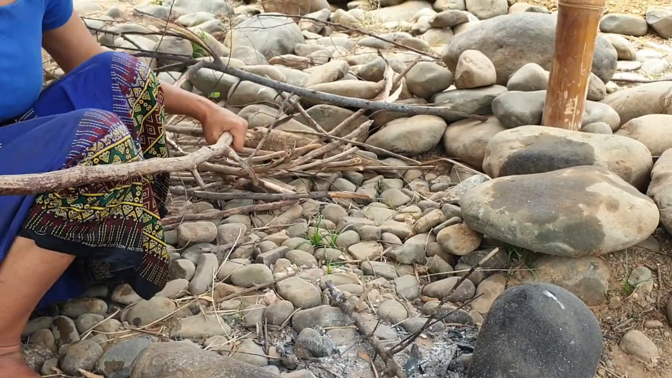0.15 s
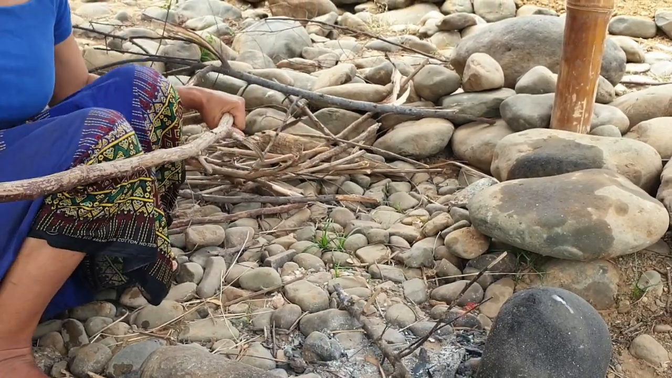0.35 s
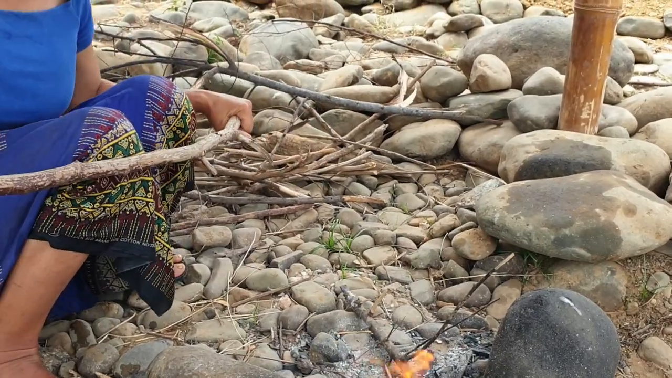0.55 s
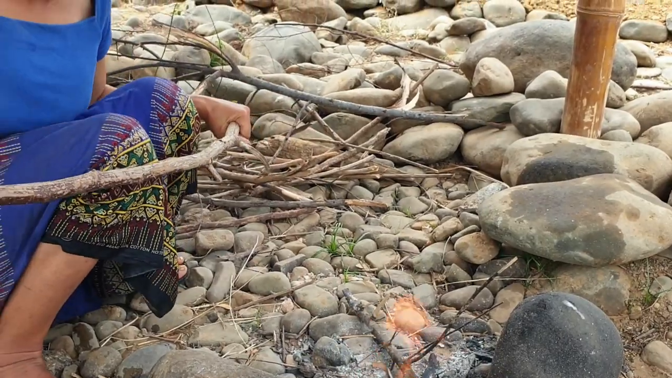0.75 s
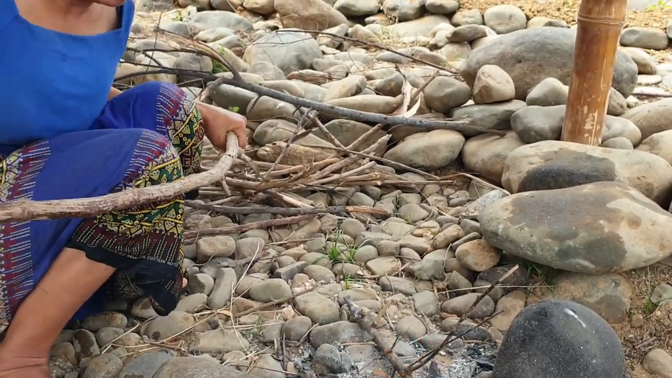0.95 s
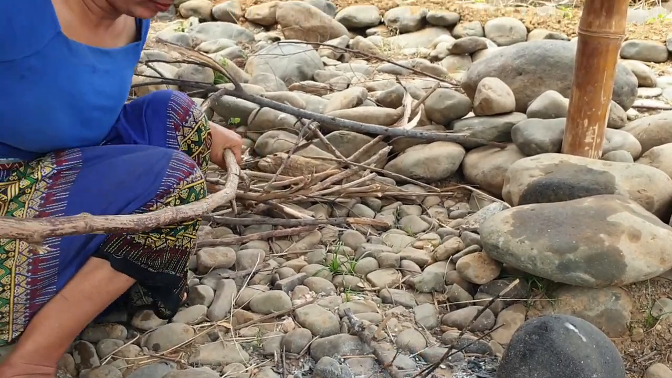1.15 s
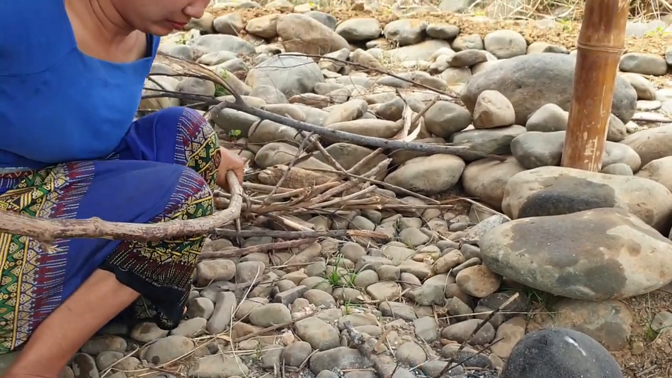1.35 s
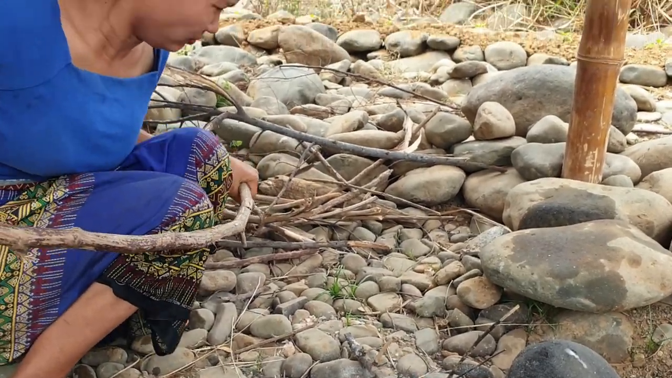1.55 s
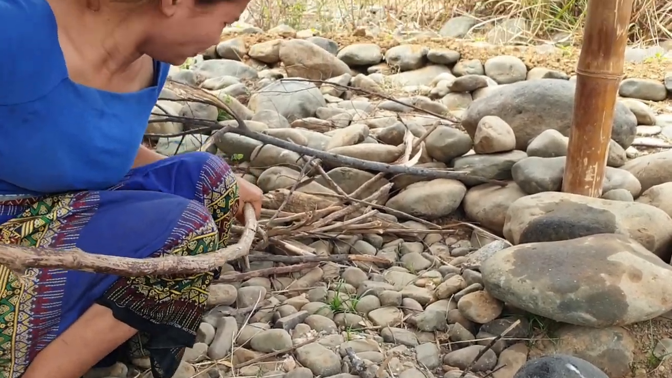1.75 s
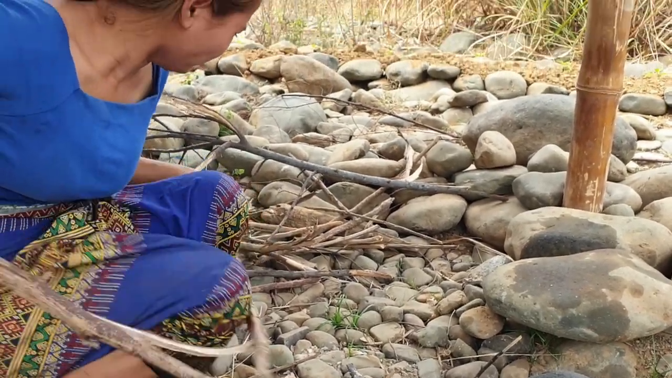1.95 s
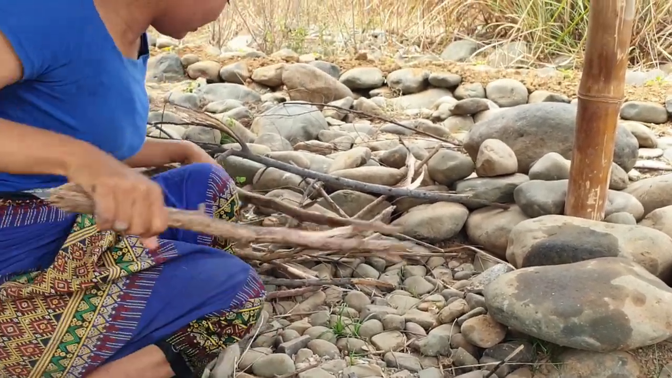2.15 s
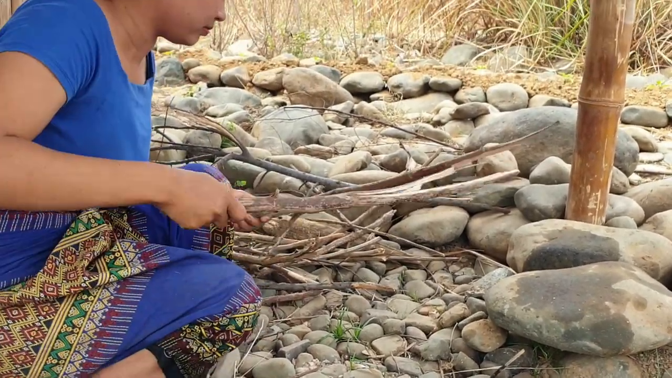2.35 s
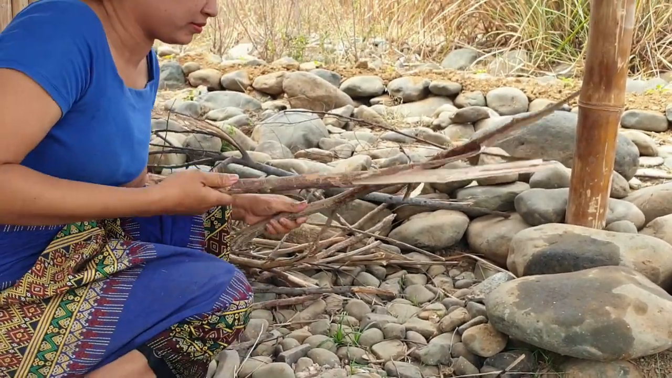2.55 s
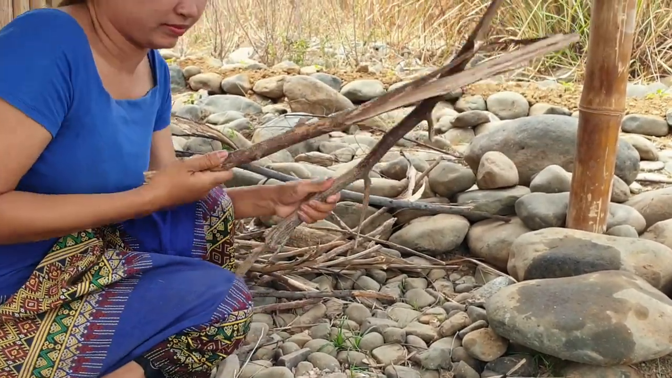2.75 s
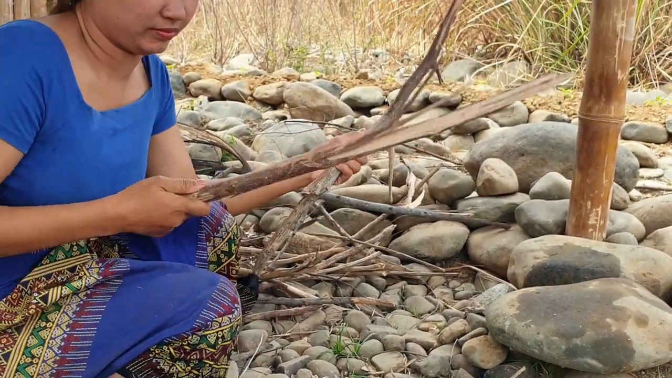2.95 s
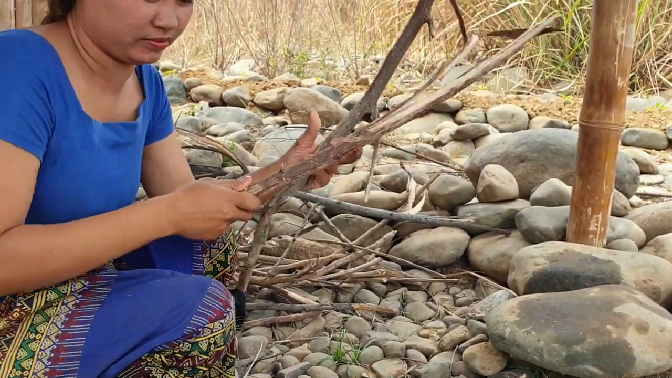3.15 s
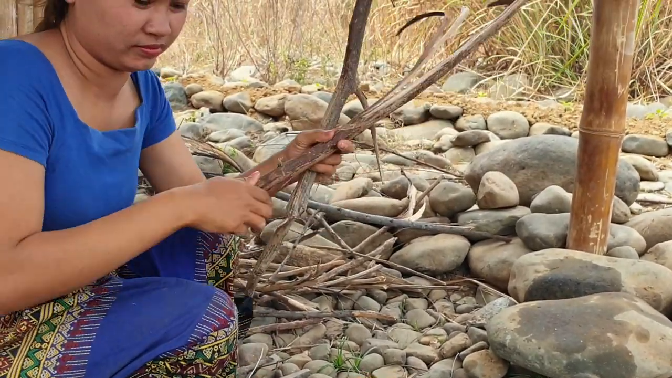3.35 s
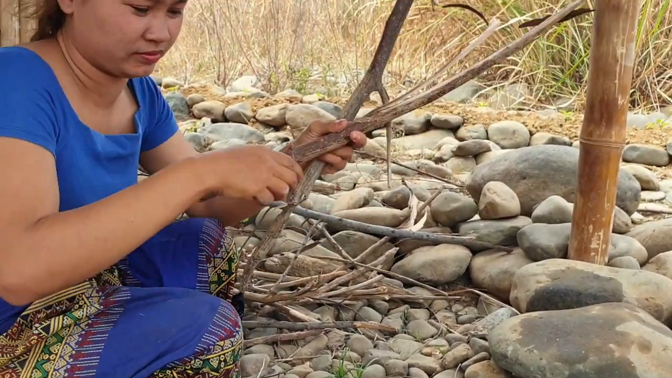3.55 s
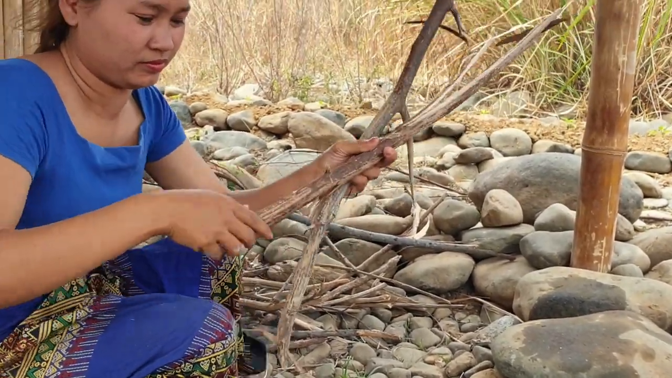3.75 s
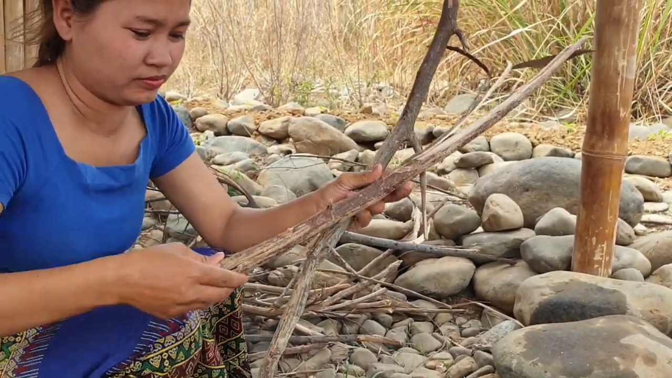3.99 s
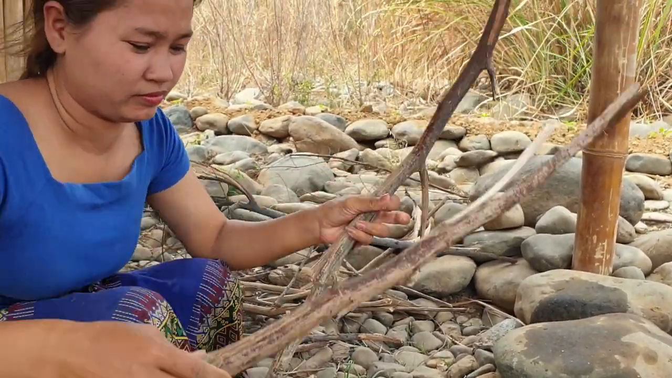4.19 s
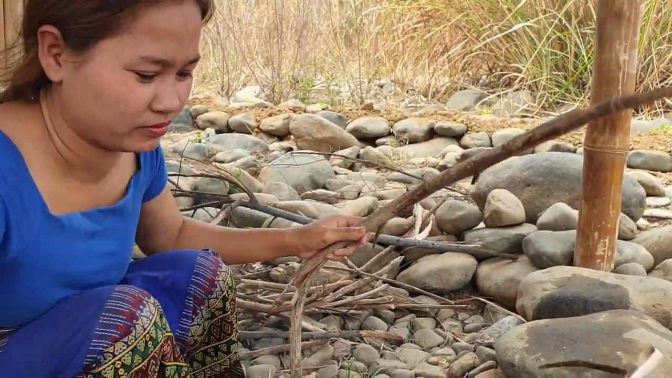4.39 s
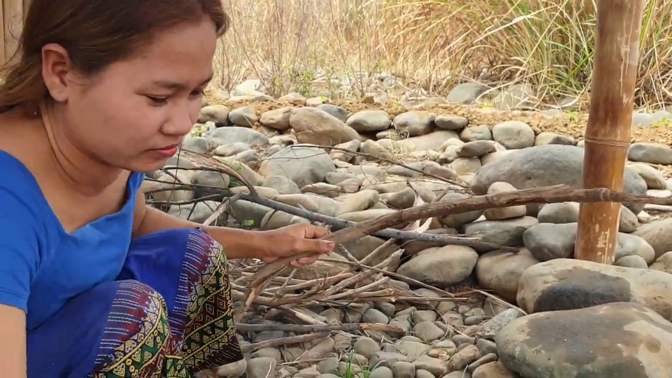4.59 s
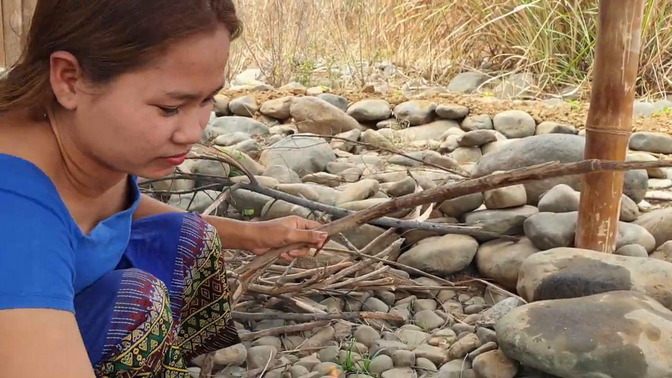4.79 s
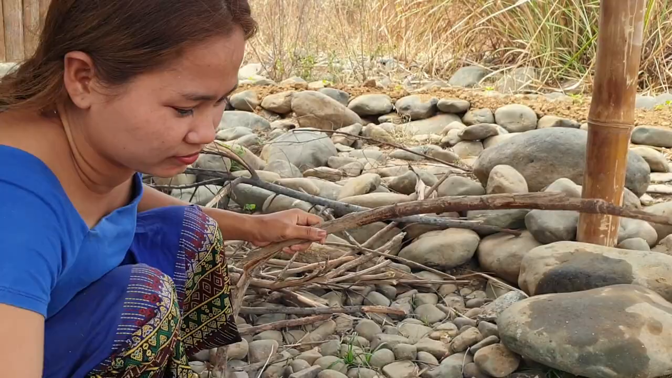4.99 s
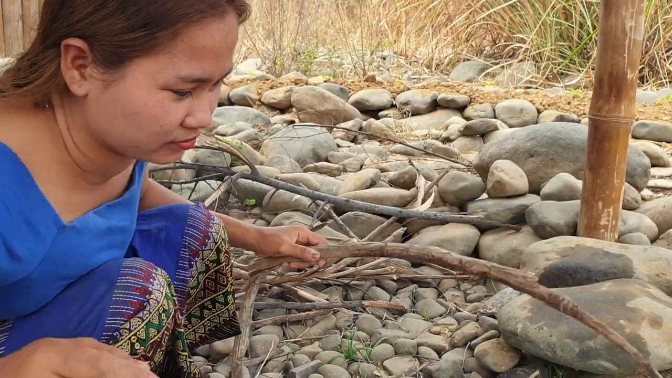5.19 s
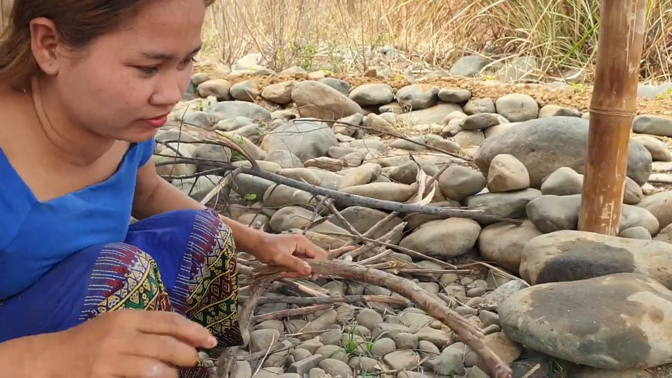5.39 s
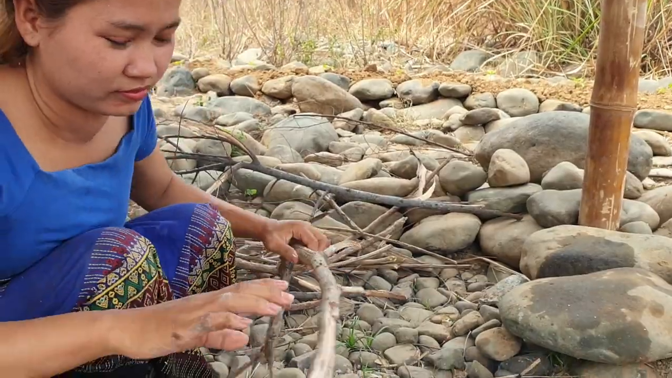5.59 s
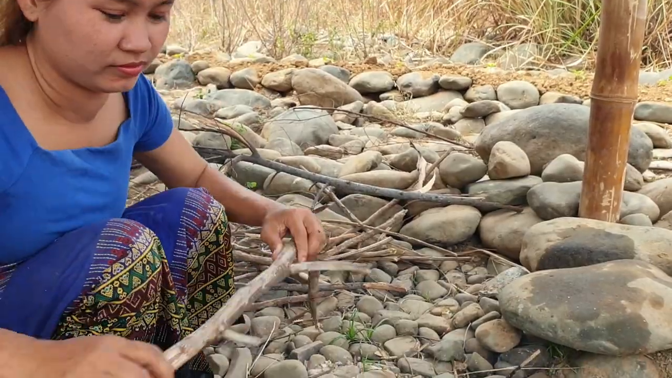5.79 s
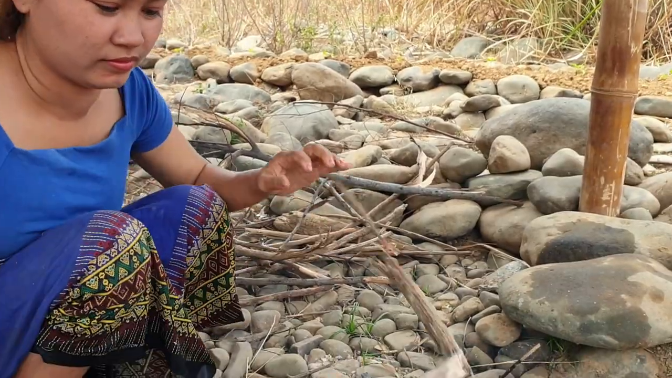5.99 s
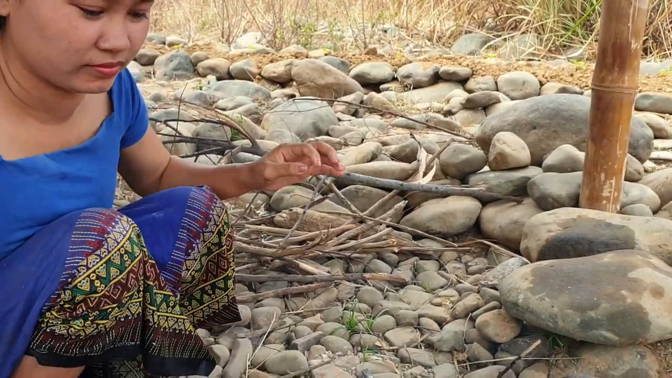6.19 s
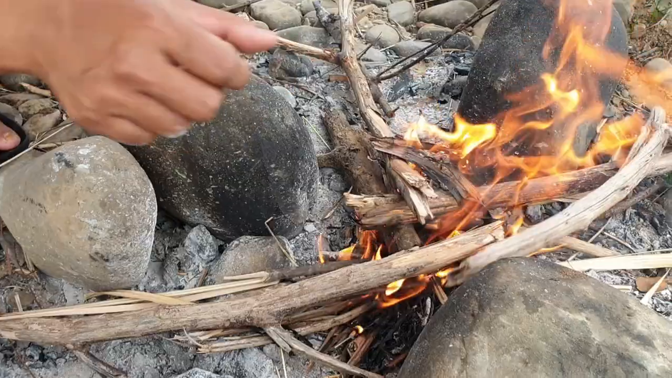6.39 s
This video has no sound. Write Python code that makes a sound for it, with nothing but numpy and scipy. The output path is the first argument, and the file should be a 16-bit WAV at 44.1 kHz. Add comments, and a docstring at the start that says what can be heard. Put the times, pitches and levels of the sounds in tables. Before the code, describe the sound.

Outdoors by a small fire, sharp fibre cracks lead to one loud stick break, then near quiet, light wood taps, ember ticks and growing rustle.

```python
"""A dry stick is bent by hand on a stony bank by a campfire, in broadband hiss, low air noise and a far engine.
From 0.5 s its fibres crack, as impulses through resonances; splinters tear, as runs of tiny slips.
At 2.0 s it breaks with a thump of decaying pressure, knock and swing, and the background sinks.
From 3.2 s loose pieces knock at lower resonances; the fire's louder ticks follow as short noise impulses.
From 4 s a rustle of noise grains grows, the background recovers, and the engine's harmonics swell again."""
import sys
import numpy as np
from scipy import signal
from scipy.fft import rfft, irfft
from scipy.io import wavfile
from scipy.ndimage import uniform_filter1d

SR = 44100
rng = np.random.default_rng(int(sys.argv[2]) if len(sys.argv) > 2 else 0)


def file_out(sig):
    """Save sig as 16-bit WAV at sys.argv[1]."""
    # one column per channel
    cols = np.atleast_2d(sig).T
    # limit, then scale
    lim = np.clip(cols, -1, 1)
    pcm = np.round(lim * 32767).astype(np.int16)
    wavfile.write(sys.argv[1], SR, pcm)


N = 283386
TIME = np.arange(N) / SR
RING_S = 0.12   # length of a short impulse
BREAK_S = 2.0116
FAINT_START_S = 0.65   # faint random cracks lie between this time and the break

# Fibres giving way: [t/s, relative energy level/dB, relative low-part level/dB]
CRACKS = [(0.503, -4.5, 0.5), (0.5673, 4, -3.5), (0.6639, -12, -18), (0.679, -17.5, -6), (0.721, -20, 4.5),
          (0.8045, -16.5, -16), (0.91, -2, -1), (0.9509, -13.5, 0), (1.0037, -2, 1.5), (1.135, -5.5, -3.5),
          (1.3864, -11.5, 0), (1.476, -12.5, -2), (1.4895, -8, -5), (1.4973, -5.5, -9),
          (1.5172, -5.5, -7.5), (1.6061, -12.5, -18), (1.6117, -4.5, -20), (1.949, -15, -1),
          (1.9625, -1, -4.5), (2.0115, 12.5, -0.5), (2.0256, 10.5, -7.5), (2.06, -7, -1.5),
          (2.0719, 3, -17), (2.0805, -3, -15), (2.103, -19, -5), (2.3364, -33.5, 0), (2.8542, -22.5, -11),
          (2.8653, -16.5, -5), (2.8723, -30, -10), (2.8867, -24, -5), (2.9029, -22, -4), (2.9207, -21, -6)]
# Splinters tearing and bark scraping: [t/s, starting level/dB, t60/s, low edge f/Hz, top edge f/Hz]
TEARS = [(1.491, -35.5, 0.1, 3000, 15000), (2.013, -17.5, 0.11, 1200, 10700),
         (2.028, -24, 0.15, 1500, 9100), (2.077, -47, 0.12, 3000, 12000), (2.125, -55.5, 0.33, 1500, 7000),
         (2.867, -49, .15, 9900, 17900), (2.872, -49, 0.37, 1100, 14100), (2.941, -43.5, 0.082, 1500, 7700),
         (3.29, -60, 0.21, 1300, 6000), (4.86, -47.5, 0.32, 2500, 11100), (5.885, -50, 0.26, 2500, 9000)]
# Sticks touching each other and pebbles:
# [t/s, relative energy level/dB, relative low-part level/dB, relative top-part level/dB]
KNOCKS = [(3.2284, -33.5, -10, -4), (3.28, -18, -9, -28), (3.7227, -29, -9, -5.5), (4.856, -20.5, -15, -6),
          (4.908, -29.5, 13.5, -1), (4.9364, -9.5, 6, -4.5), (5.0324, -22.5, -5, -4.5),
          (5.2082, -22, -2, -2), (5.4738, -20, -8, 0), (5.8754, -11, -20, -7), (5.892, -17, -15, -15),
          (6.3035, -17.5, 0, -4)]
# The fire's loudest ticks: [t/s, relative energy level/dB]
EMBERS = [(3.843, -33), (4.1042, -37), (4.251, -29), (4.3142, -30), (4.3435, -32.5), (4.458, -34),
          (4.4917, -31), (5.391, -19.5), (5.6726, -26), (5.7143, -24), (6.214, -24), (6.2207, -22.5),
          (6.268, -25)]
# Resonances of the bent stick: [f/Hz, bandwidth/Hz, level/dB]
STICK_MODES = [(2370, 210, -4), (3570, 100, -2.5), (4185, 290, -3.5), (5230, 370, -1), (5880, 120, -2),
               (6410, 350, -3), (12500, 1300, -9.5)]
# Resonances of the loose pieces: [f/Hz, bandwidth/Hz, level/dB]
PIECE_MODES = [(680, 105, 4.5), (1120, 110, 1.5), (1716, 120, 0), (3170, 220, -2), (4160, 130, -3.5),
               (4770, 100, 1), (6380, 290, 3)]
# Puffs of air as arms and sticks swing past: [middle t/s, length/s, level/dB, centre f/Hz]
PUFFS = [(1.005, .12, -51.5, 220), (1.53, .12, -44, 60), (2.63, .3, -55, 79.6), (2.87, .2, -56.5, 80.4),
         (3.15, .18, -46.5, 69), (4.31, .18, -54.5, 69.9), (4.87, .12, -48.5, 90.5), (5.35, .14, -43, 100),
         (5.49, .1, -42.5, 75), (5.62, 0.21, -48, 146)]
# Swells of a far engine: [centre t/s, rise spread/s, fall spread/s, f/Hz, level over low background/dB]
DRONES = [(.85, 0.78, .6, 62.45, 11), (5.3, .4, 0.27, 81, 5.5)]
# Background before layer gains: [t/s, treble level/dB, low-band level/dB, bass level/dB]
BACKGROUND = [(0.0, -61, -63.5, -58.5), (0.48, -61.5, -61, -54), (0.86, -58, -58.5, -50.5),
              (1.13, -57.5, -57.5, -54), (1.7, -57, -60, -56), (1.95, -56, -57, -52), (2.11, -66, -72, -61),
              (2.29, -74.5, -76.5, -67.5), (3.15, -75, -74.5, -64), (3.83, -70.5, -73, -69),
              (4.15, -71.5, -75.5, -69.5), (4.54, -65, -65, -61.5), (4.85, -64, -61.5, -61),
              (5.08, -60.5, -58.5, -52), (5.32, -60, -57, -52), (5.89, -60, -58, -62),
              (6.43, -60, -59, -57.5)]
# Relative spectral densities of bass air, low-band air and treble hiss: [f/Hz, level per Hz/dB]
RUMBLE = [(20, -10.5), (35, -8), (55, 2), (80, 0), (125, -4.5), (170, -12), (260, -28.5), (500, -60)]
FLUTTER = [(80, -31.5), (170, -2.5), (250, -2.5), (400, -6.5), (600, -13), (900, -21), (2000, -38)]
HISS = [(200, -13.5), (600, -0.5), (1200, -1), (1700, -1), (2500, -1.5), (4000, -2.5), (6400, -1.5),
        (9000, -5.5), (11500, -3), (16000, -13)]
# Correlation of left and right in the air noise: [f/Hz, coefficient]
SIDE_CORRELATION = [(60, 0.59), (300, 0.59), (640, 0.53), (1300, -0.45), (2600, .05), (6000, -.05),
                    (15000, 0.14)]


def cracks(top_per_weaker_db=0.2226, woody_db=1, lowest_hz=2000, linger_db=-11, faint_db=-25,
           faint_spread_db=2.5):
    """Impulse excitation: each failing fibre rings the stick's modes, and weaker cracks are brighter."""
    out = np.zeros((2, N))
    faint = []
    for when, size in rng.random(size=(5, 2)):
        s = FAINT_START_S + when * (BREAK_S - FAINT_START_S)
        faint.append((s, faint_db + faint_spread_db * (2 * size - 1), 0))
    for s, db, low_db in list(CRACKS) + faint:
        top_db = -top_per_weaker_db * db
        linger = from_db(linger_db) * dying_noise(t60=0.14, length_s=RING_S)
        ring = impulse(spike_db=-3, t60=0.032) + linger
        crack = coloured(ring, 3600, low_db + woody_db, 8000, top_db)
        add(out, s, from_db(db) * panned(crack, pan_db=2))
    rung = wood(out, STICK_MODES, broad_db=-3)
    bright = cut(rung, lowest_hz, "high", order=6)
    faint_body = from_db(-24.5) * cut(rung, [300, 1800], "band")
    return bright + faint_body


def thump(swing_hz=60, swell_s=0.0075, swing_db=-12, jolt_db=-5, jolt_s=0.00081, pull_db=-22,
          pull_s=0.009, knock_db=11, clack_db=11, right_lag_s=0.0002):
    """Release of strain: a pressure jolt, slower pull of air, dull knock, woody clack and damped swing."""
    out = np.zeros((2, N))
    t = TIME[:SR // 4]
    # The swing's envelope peaks at swell_s
    swell = t / swell_s * np.exp(1 - t / swell_s)
    swing = from_db(swing_db) * swell * np.sin(2 * np.pi * swing_hz * t)
    since = t - np.array([[0], [right_lag_s]])
    step = from_db(jolt_db) * (since >= 0) * np.exp(-since / jolt_s)
    jolt = cut(step, 1800, "low", order=1)
    pull = from_db(pull_db) * np.exp(-t / pull_s)
    add(out, BREAK_S, swing - pull - panned(jolt, pan_db=6))
    knock = cut(dying_noise(t60=0.15, length_s=0.24), 160, "high")
    knock = cut(knock, 380, "low", order=1)
    add(out, BREAK_S, from_db(knock_db) * panned(knock, pan_db=4))
    clack = cut(dying_noise(t60=0.07, length_s=RING_S), [1200, 2000], "band")
    add(out, BREAK_S, from_db(clack_db) * clack)
    return out


def tears(per_s=2500, spread_db=3.5, slip_s=0.0004):
    """Stick-slip: splitting or sliding wood emits a dying run of tiny slips that excite its modes."""
    out = np.zeros((2, N))
    t = TIME[:SR // 4]
    for s, db, t60, low_hz, top_hz in TEARS:
        slips = grains(len(t), per_s, spread_db, slip_s)
        rung = wood(slips, STICK_MODES, broad_db=2)
        edged = cut(cut(rung, low_hz, "high"), top_hz, "low", order=4)
        decay = from_db(db - 60 * t / t60)
        add(out, s, decay * panned(rms_one(edged), pan_db=1.5))
    return out


def knocks(gain_db=-1, bright_db=3, lowest_hz=330):
    """Impact excitation: light contacts ring the loose pieces, with modes lower than the bent stick's."""
    out = np.zeros((2, N))
    for s, db, low_db, top_db in KNOCKS:
        contact = impulse(spike_db=-7.5, t60=0.05)
        knock = coloured(contact, 1540, low_db, 6900, top_db + bright_db)
        add(out, s, from_db(db + gain_db) * panned(knock, pan_db=3))
    return cut(wood(out, PIECE_MODES, broad_db=1.5), lowest_hz, "high")


def embers(gain_db=1, faint_per_s=24, faint_db=-7, lowest_hz=5500):
    """Impulsive emission: dry ticks nearly without ring, over random faint ones that follow the treble."""
    out = np.zeros((2, N))
    for s, db in EMBERS:
        add(out, s, from_db(db + gain_db) * impulse(spike_db=-2, t60=0.0082))
    treble_db, _, _ = background()
    faint = rms_one(grains(N, faint_per_s, spread_db=3, grain_s=0.0006))
    out += from_db(treble_db + faint_db) * faint
    bright = cut(cut(out, lowest_hz, "high", order=1), 1500, "high")
    return panned(bright, pan_db=3)


def rustle(per_s=35, spread_db=4, grain_s=0.016, held_db=-12, laid_db=-2, start_s=4.07, rise_s=1.7):
    """Frictional noise: overlapping grains of cloth and bark grow louder as the stick is laid down."""
    treble_db, _, _ = background()
    db = treble_db + np.interp(TIME, [start_s, start_s + rise_s], [held_db, laid_db])
    soft = cut(grains(N, per_s, spread_db, grain_s), [1500, 3400], "band")
    return from_db(db) * rms_one(soft)


def bank(x, echo_db=-22, t60=0.24, dull_hz=7000):
    """Diffuse reflection: boulders and posts return a faint, duller tail, by convolution."""
    tail = cut(dying_noise(t60, length_s=0.5), dull_hz, "low", order=1)
    return x + from_db(echo_db) * signal.fftconvolve(x, tail, axes=1)[:, :N]


def puffs(width_share=0.63, top_hz=200):
    """Narrow-band turbulence: each puff is a smooth swell of low noise around its own frequency."""
    out = np.zeros((2, N))
    for s, length_s, db, hz in PUFFS:
        swell = np.hanning(int(length_s * SR))
        air = resonance(rng.standard_normal(SR), hz, width_share * hz)
        # Keep the end, where the filters have settled
        air = cut(air, top_hz, "low")[None, -len(swell):]
        add(out, s - length_s / 2, from_db(db) * swell * evened(air, window_s=0.0414))
    return out


def engine(second_db=-6, third_db=-17, unsteady=0.012):
    """Harmonic series: a firing rate and two overtones waver in pitch under bell-shaped swells."""
    _, low_db, _ = background()
    out = np.zeros(N)
    for s, rise_s, fall_s, hz, db in DRONES:
        spread_s = np.where(TIME < s, rise_s, fall_s)
        swell = np.exp(-((TIME - s) / spread_s) ** 2 / 2)
        phase = 2 * np.pi * np.cumsum(hz * (1 + unsteady * wander(hz=13))) / SR
        tone = np.sin(phase)
        tone += from_db(second_db) * np.sin(2 * phase)
        tone += from_db(third_db) * np.sin(3 * phase)
        out += from_db(low_db + db) * swell * rms_one(tone)
    return out


def outdoors(rumble_gain_db=3, rumble_floor_db=-68, flutter_gain_db=2, flutter_floor_db=-77,
             hiss_gain_db=4.5, lumpy_db=1.5):
    """Superposition of independent noises: lumpy low air at the microphone under a wide hiss."""
    treble_db, low_db, bass_db = background()
    lumps = from_db(lumpy_db * wander(hz=7.4))
    # hypot adds the power of a constant floor
    rumble_level = np.hypot(from_db(bass_db + rumble_gain_db), from_db(rumble_floor_db))
    rumble = rumble_level * evened(air_noise(RUMBLE), window_s=0.091)
    flutter_level = np.hypot(from_db(low_db + flutter_gain_db), from_db(flutter_floor_db))
    flutter = flutter_level * evened(air_noise(FLUTTER), window_s=0.08)
    hiss = from_db(treble_db + hiss_gain_db) * air_noise(HISS)
    low_air = lumps * (rumble + flutter) + puffs() + engine()
    return panned(low_air, pan_db=2.5) + panned(hiss, pan_db=0.63)


def background():
    """Slow level variation: treble, low-band and bass levels in dB, interpolated at every sample."""
    s, *columns = np.transpose(BACKGROUND)
    return [np.interp(TIME, s, column) for column in columns]


def air_noise(spectrum):
    """Spectral shaping: steady unit-power noise whose left-right correlation depends on frequency."""
    hz = np.arange(N // 2 + 1) * SR / N
    alike = np.clip(at_hz(SIDE_CORRELATION, hz), -1, 1)
    mid, side = rfft(rng.standard_normal((2, N)))
    both = np.sqrt(1 + alike) * mid + np.sqrt(1 - alike) * side * [[1], [-1]]
    return rms_one(irfft(both * from_db(at_hz(spectrum, hz)), N))


def evened(x, window_s):
    """Power normalization: divide a noise by its short-term level."""
    power = uniform_filter1d(np.mean(x ** 2, axis=0), max(2, int(window_s * SR)))
    return x / np.sqrt(power + 1e-9)


def wander(hz):
    """Low-pass random process: a slow wavering of unit power."""
    return rms_one(cut(rng.standard_normal(N), hz, "low"))


def grains(size, per_s, spread_db, grain_s):
    """Shot noise: random slips of uneven strength share decaying power, with separate noise a side."""
    strength = from_db(spread_db * np.minimum(rng.exponential(1, size), 3))
    slips = strength * (rng.random(size) < per_s / SR)
    power = signal.lfilter([1], [1, -np.exp(-1 / (grain_s * SR))], slips ** 2 + 1e-12)
    return np.sqrt(power) * rng.standard_normal((2, size))


def dying_noise(t60, length_s):
    """Exponential decay: stereo noise falling 60 dB per t60, with unit energy a side."""
    t = TIME[:int(length_s * SR)]
    x = rng.standard_normal((2, len(t))) * from_db(-60 * t / t60)
    return x / np.sqrt(np.sum(x ** 2, axis=1, keepdims=True))


def impulse(spike_db, t60):
    """Direct and scattered waves: a spike, left first and inverted on the right, within dying noise."""
    x = dying_noise(t60, RING_S)
    x[0, 2] += from_db(spike_db)
    x[1, rng.integers(6, 24)] -= from_db(spike_db - 3)
    return x / np.sqrt(1 + from_db(spike_db) ** 2)


def wood(x, modes, broad_db):
    """Modal superposition: a few clear resonances stand on a broad bed."""
    out = from_db(broad_db) * x
    for hz, width_hz, db in modes:
        out = out + from_db(db) * resonance(x, hz, width_hz)
    return out


def coloured(x, low_hz, low_db, top_hz, top_db):
    """Band division: crossovers set the low and top parts against an unchanged middle."""
    def crossover(v, hz, kind):
        """Cascaded filtering: the same cut twice."""
        return cut(cut(v, hz, kind), hz, kind)
    low = crossover(x, low_hz, "low")
    upper = crossover(x, low_hz, "high")
    middle = crossover(upper, top_hz, "low")
    top = crossover(upper, top_hz, "high")
    return from_db(low_db) * low + middle + from_db(top_db) * top


def resonance(x, hz, width_hz):
    """Damped oscillation: a two-pole resonance with about unit gain at its peak."""
    r = np.exp(-np.pi * width_hz / SR)
    zeros = np.array([1, 0, -1]) * (1 - r * r) / 2
    poles = [1, -2 * r * np.cos(2 * np.pi * hz / SR), r * r]
    return signal.lfilter(zeros, poles, x + 1e-18)


def cut(x, hz, kind, order=2):
    """Frequency selection: a causal Butterworth filter."""
    sos = signal.butter(order, np.minimum(hz, 0.45 * SR), kind, fs=SR, output="sos")
    return signal.sosfilt(sos, x + 1e-18)


def panned(x, pan_db):
    """Interchannel level difference: left minus right, split between the sides."""
    return x * from_db(np.array([[pan_db], [-pan_db]]) / 2)


def add(track, s, sound):
    """Linear superposition: mix a short sound in at a time in seconds."""
    i = max(0, round(s * SR))
    track[:, i:i + sound.shape[1]] += sound[:, :N - i]


def from_db(db):
    """Logarithmic level: decibels to amplitude gain."""
    return 10 ** (np.asarray(db) / 20)


def rms_one(x):
    """Mean-square normalization: scale to unit power."""
    return x / np.sqrt(np.mean(x ** 2) + 1e-20)


def at_hz(points, hz):
    """Logarithmic frequency scale: interpolate a table over it."""
    table = np.array(points)
    return np.interp(np.log(hz + 1), np.log(table[:, 0]), table[:, 1])


def scene():
    """Superposition of sources: wood and fire with reflections, then the direct thump and surroundings."""
    reflected = bank(cracks() + tears() + knocks() + embers())
    return reflected + thump() + rustle() + outdoors()


def record(dry, notch_hz=8500, notch_width_hz=1700, notch_depth=0.36, cutoff_hz=15780):
    """Transducer limits: the microphone port dips the treble, peaks clip and the top is cut."""
    heard = dry - notch_depth * resonance(dry, notch_hz, notch_width_hz)
    top_cut = signal.ellip(12, 0.1, 105, cutoff_hz, fs=SR, output="sos")
    return signal.sosfilt(top_cut, np.clip(heard, -1, 1))


dry = scene()
out = record(dry)
file_out(out)
```